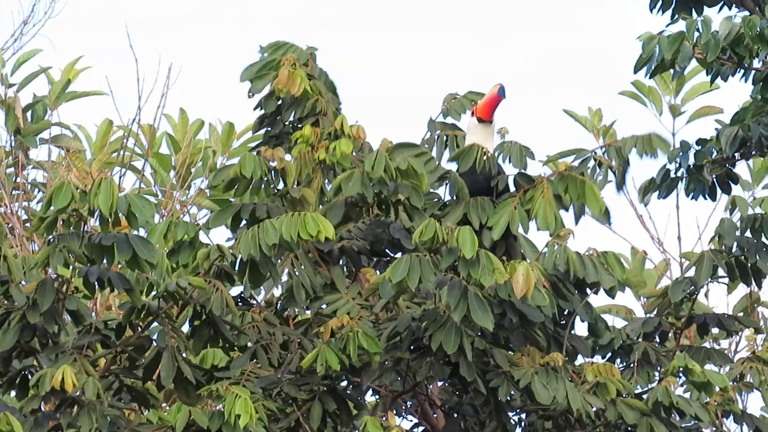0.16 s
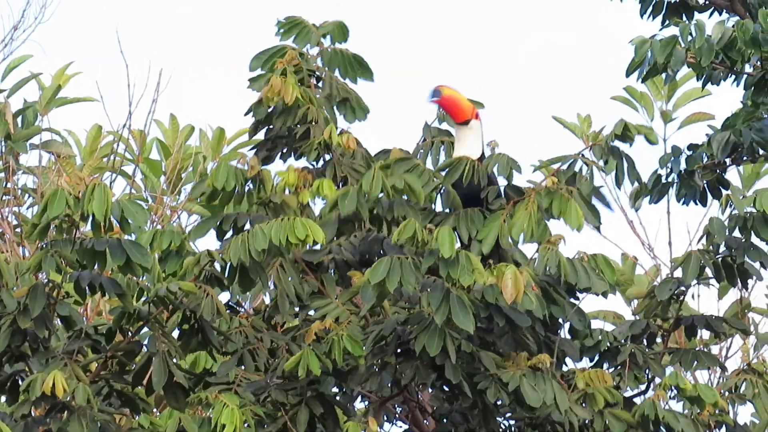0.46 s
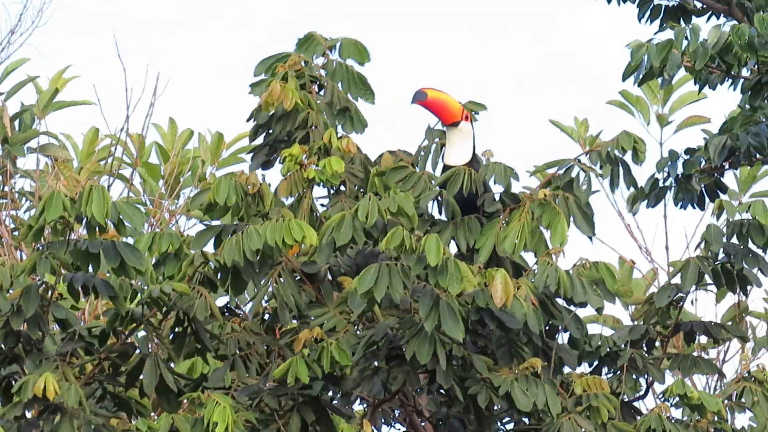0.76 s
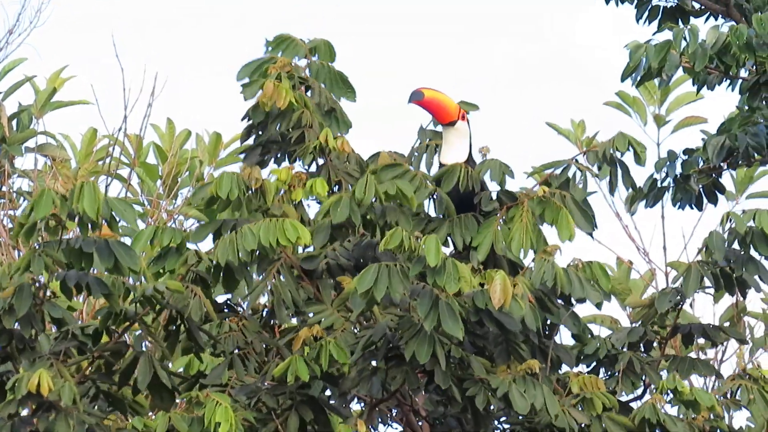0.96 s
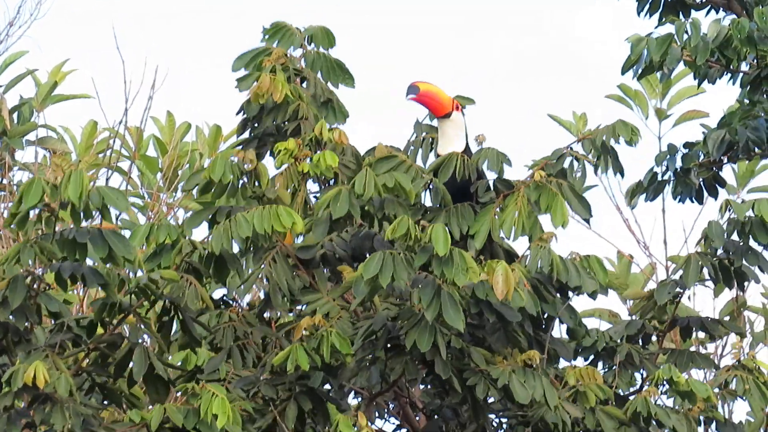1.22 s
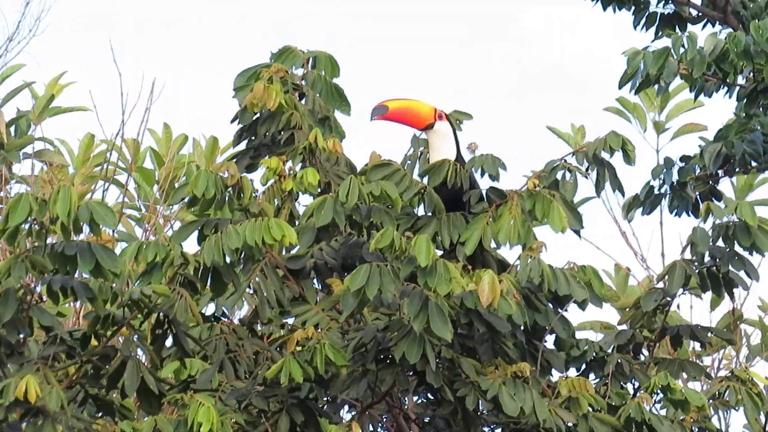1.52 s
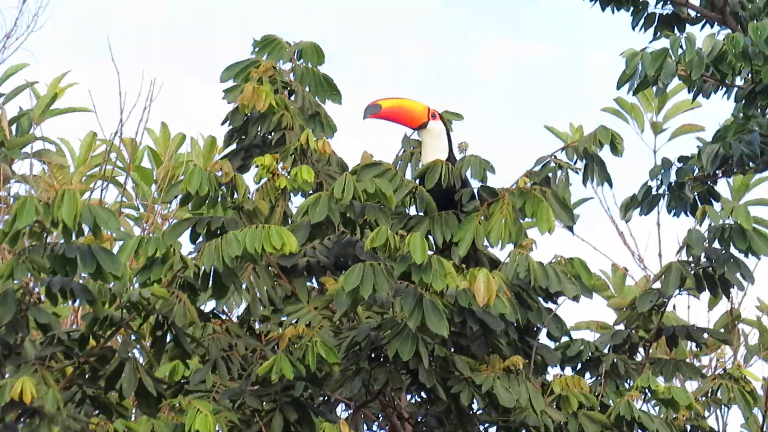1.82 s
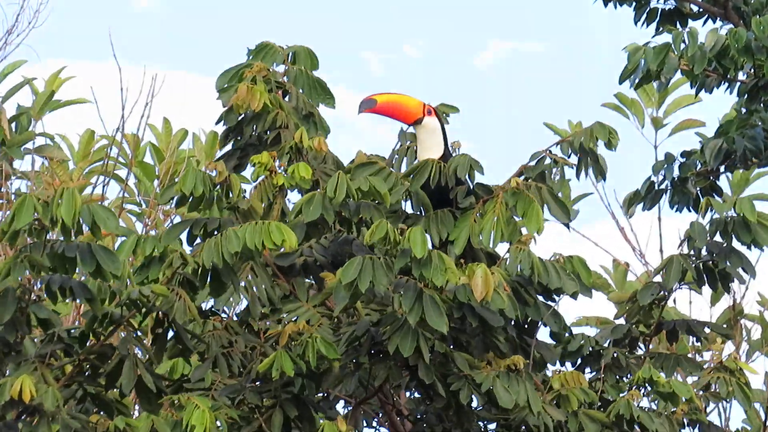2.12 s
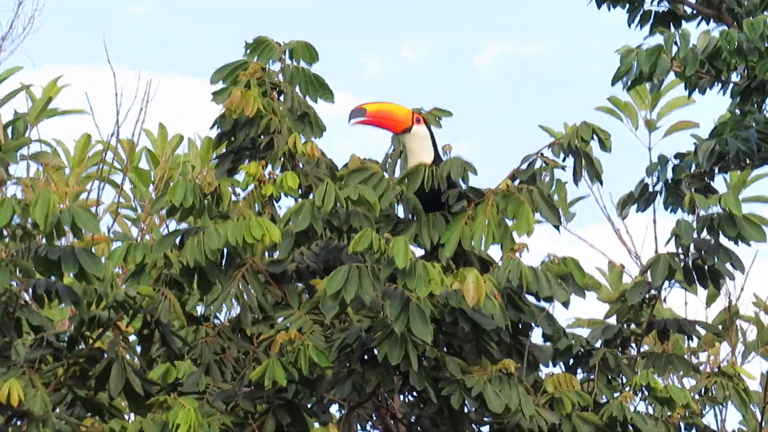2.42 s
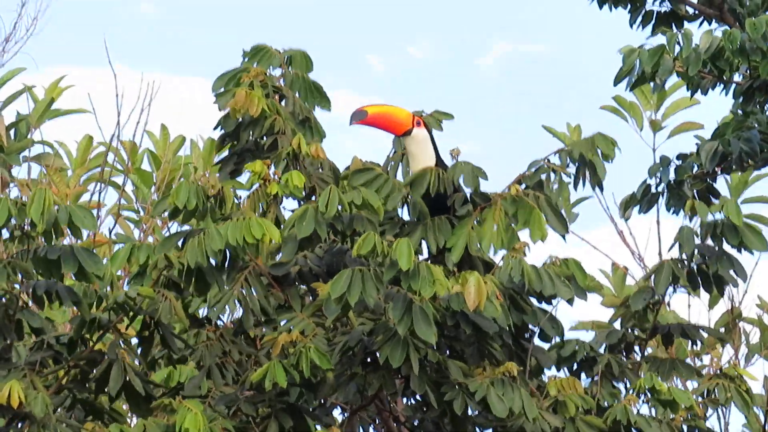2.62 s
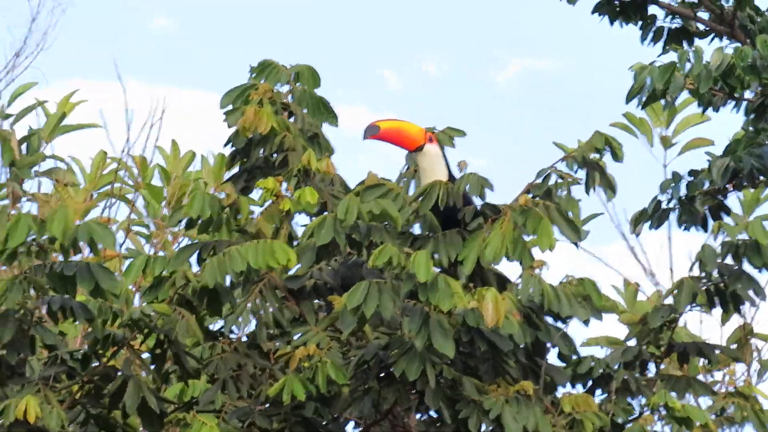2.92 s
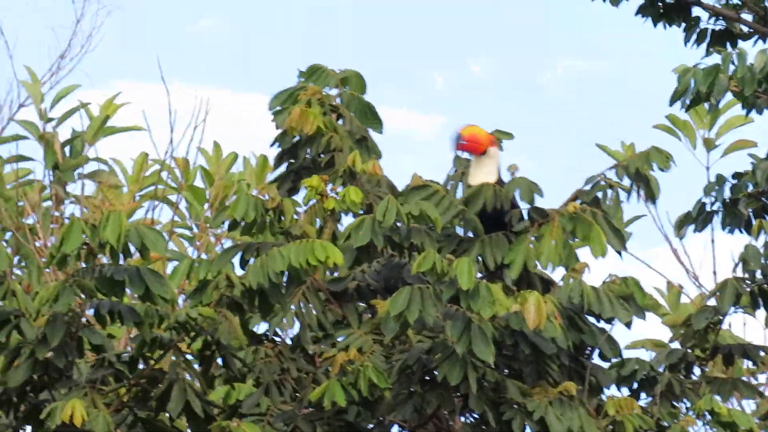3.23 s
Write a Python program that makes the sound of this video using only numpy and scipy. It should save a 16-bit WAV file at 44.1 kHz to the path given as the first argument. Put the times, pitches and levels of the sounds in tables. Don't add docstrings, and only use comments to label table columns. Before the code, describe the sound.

A toucan croaks four times, at about 0.35, 1.25, 2.3 and 3.15 seconds. Each croak lasts about 0.2 seconds: nine or so rapid throaty clicks, slowing slightly, swelling and opening into a hollow, nasal rasp, strongest around 1.8 kHz. The third starts softest; the last is brightest. Trees add short echoes and a diffuse tail. Quiet distant traffic rumble, wavering low engine drone and faint hiss run throughout.

```python
import sys
import numpy as np
from scipy import signal
from scipy.fft import rfft, irfft
from scipy.io import wavfile
from scipy.ndimage import uniform_filter1d

SR = 44100
rng = np.random.default_rng(int(sys.argv[2]) if len(sys.argv) > 2 else 0)


def master(y):
    cut = np.clip(np.atleast_2d(y).T, -1, 1)
    pcm = np.round(cut * 32767)
    wavfile.write(sys.argv[1], SR, pcm.astype(np.int16))


def invert_db(level):
    return 10 ** (np.asarray(level, dtype=float) / 20)


N = 148617


def evened(x):
    return x / np.sqrt(np.mean(abs(x) ** 2) + 1e-20)


def read(points, hz):
    f, value = np.transpose(points)
    return np.interp(np.log(hz + 1), np.log(f + 1), value)


def add(mix, s, sound):
    part = mix[round(s * SR):][:len(sound)]
    part += sound[:len(part)]


def slow(t, top_hz):
    rates = np.geomspace(.3, top_hz, 16)
    return evened(sum(np.sin(2 * np.pi * (f * t + rng.random())) / np.sqrt(f) for f in rates))


# (frequency [Hz], level [dB per Hz])
RUMBLE_SPECTRUM = [(18, -10), (30, 1), (41, -22.5), (68, -2.5), (141, -10), (259, -12), (450, -19),
                   (620, -35.5), (900, -81)]
# (frequency [Hz], level [dB per Hz])
WASH_SPECTRUM = [(350, -28), (600, -1), (777, -5), (843, -4.5), (1120, -6.5), (1640, -13.5), (3810, -24),
                 (5970, -28), (15500, -44.5)]
# (frequency [Hz], likeness [0-1])
PORT_LIKENESS = [(60, .9998), (300, .985), (700, .97), (1500, .95), (3000, .87), (6000, .78), (9000, .88),
                 (12000, .97)]
# (frequency [Hz], lead [rad])
PORT_LEAD = [(30, -0.4), (70, 0.16), (140, 0.29), (280, 0.99), (430, 1.0), (560, 0.34), (690, -0.21),
             (2000, 0.5)]
# (frequency [Hz], left over right [dB])
PORT_TILT = [(60, -1.2), (180, -2.2), (550, 0.99), (1650, 1.0), (4970, 0.0), (15000, 0.0)]
RUMBLE_DB, WASH_DB = -36.5, -48.5


def traffic(spectrum, level_db, patchy_db, swell_db):
    frames, hz = N // 512 + 5, np.fft.rfftfreq(2048, 1 / SR)
    a, b, c, d, patches = rng.standard_normal((frames, 1025, 5)).T
    patches = uniform_filter1d(patches, size=6, axis=0)
    patches = evened(uniform_filter1d(patches, size=8, axis=1))
    same = np.clip(read(PORT_LIKENESS, hz), 0, 1)[:, None]
    common, private = a + 1j * b, c + 1j * d
    port = (invert_db(read(PORT_TILT, hz) / 2) * np.exp(.5j * read(PORT_LEAD, hz)))[:, None]
    left = common * port
    right = (same * common + np.sqrt(1 - same ** 2) * private) / port
    swell = swell_db * slow(np.arange(frames) * 512 / SR, 3.1)
    z = np.array([left, right]) * invert_db(read(spectrum, hz)[:, None] + patchy_db * patches + swell)
    noise = signal.istft(z, nperseg=2048, noverlap=1536)[1][:, 512:N + 512]
    return invert_db(level_db) * evened(noise)


def fine(t, curve):
    return np.interp(np.arange(N) / SR, t, curve)


def tone(hz):
    return np.sqrt(2) * np.sin(2 * np.pi * np.cumsum(hz) / SR)


# (frequency [Hz], level [dB rms], waver [share of pitch], swell [dB])
SIDE_ORDERS = [(30.3, -67.5, 0.021, -15), (85, -49, 0.044, 6), (118.3, -50, 0.0382, 1),
               (170, -51, 0.0317, -4)]
# (time [s], frequency [Hz], level [dB rms])
MAIN_ORDER = [(0.0, 73.4, -47), (0.03, 73.6, -47), (0.46, 72.3, -72), (0.58, 68.95, -40), (1.88, 66.1, -41),
              (2.01, 73.9, -35.5), (2.14, 67.5, -36), (2.26, 68.7, -31.5), (2.38, 70.8, -62),
              (2.6, 66.45, -34.5), (2.99, 65.3, -44), (3.37, 67, -55)]


def drone():
    t = np.arange(0, N + 400, 400) / SR
    tones = np.zeros(N)
    for hz, db, waver, swell_db in SIDE_ORDERS:
        level = invert_db(db + swell_db * fine(t, slow(t, 8)))
        tones += level * tone(hz * (1 + waver * fine(t, slow(t, 6))))
    s, hz, db = np.transpose(MAIN_ORDER)
    pitch = fine(t, np.interp(t, s, hz) * (1 + .02 * slow(t, 7.3)))
    level = invert_db(fine(t, np.interp(t, s, db) + 2.1 * slow(t, 5.9)))
    tones += level * tone(pitch)
    return tones * invert_db(np.array([[-.6], [.6]]))


# (delay [s], left level [dB], right level [dB])
BRANCHES = [
    (.0042, -14, -9),
    (.0072, -10, -17),
    (.019, 2, -3),
    (.027, -35.5, -9),
]
# (frequency [Hz], decay t60 [s], left-right likeness [0-1])
TREE_DECAY = [(1000, 0.51, 0.92), (1750, 0.5, 0.98), (3500, 0.69, 0.81), (6000, 0.67, .6),
              (10000, 0.17, .3)]
TREES_DB, TREES_RISE_S = -0.5, 0.011
NEAR_LEAVES_DB, NEAR_LEAVES_S = 1.5, 0.032
OPPOSED_HZ = 10600


def trees(x):
    taps = np.zeros((2, SR))
    at = np.arange(200, SR - 20, 20) + rng.integers(0, 20, (2, (SR - 201) // 20))
    np.put_along_axis(taps, at, rng.choice([-1., 1.], at.shape), 1)
    hz, t, z = signal.stft(taps, SR, nperseg=256)
    table = np.array(TREE_DECAY)
    alike = np.clip(read(table[:, ::2], hz), 0, 1)[:, None]
    z[1] = alike * z[0] + np.sqrt(1 - alike ** 2) * z[1]
    decay = invert_db(-60 * t / read(table[:, :2], hz)[:, None])
    tail = signal.istft(z * decay, SR, nperseg=256)[1][:, :SR]
    s = np.arange(SR) / SR
    tail *= np.minimum(s / TREES_RISE_S, 1) * (1 + invert_db(NEAR_LEAVES_DB) * np.exp(-s / NEAR_LEAVES_S))
    tail *= invert_db(TREES_DB) / np.linalg.norm(tail[0])
    tail[:, 0] = 1
    for delay, left_db, right_db in BRANCHES:
        tail[:, round(delay * SR)] += invert_db(np.array([left_db, right_db]))
    lag = np.pi * np.minimum(np.arange(SR // 2 + 1) / OPPOSED_HZ, 1.2) ** 4
    tail[1] = irfft(rfft(tail[1]) * np.exp(-1j * lag), SR)
    return signal.fftconvolve(x[None], tail, axes=1)[:, :N]


def whitened(x):
    z = rfft(x)
    smooth_power = uniform_filter1d(abs(z) ** 2, size=7)
    return evened(irfft(z / np.sqrt(smooth_power + 1e-9), len(x)))


GAP_FIRST_S, GAP_LAST_S, GAP_SETTLE = .0135, .0205, 2.2
FLUTTER_DB, FLUTTER_S = 0, .0026
UNEVEN_DB, RASP_DB = 2, -9


def throat(at, shut, first_db):
    u = np.arange(500) / SR / FLUTTER_S
    burst = u ** 0.66 * np.exp(-u)
    noise = rng.standard_normal((13, 500))
    size_db = UNEVEN_DB * rng.standard_normal(12)
    size_db[0] += first_db
    rasp = invert_db(RASP_DB) * np.gradient(rng.standard_normal(len(shut))) * 2
    drive = rasp * (np.arange(len(shut)) / SR < at[-1]) * (1 - shut) ** 2
    for n, s in enumerate(at):
        click = whitened(burst * (noise[12] + invert_db(FLUTTER_DB) * noise[n]))
        add(drive, s, invert_db(size_db[n]) * click)
    return drive


def resonate(x, hz, width):
    turn = np.exp(2j * np.pi * np.cumsum(hz) / SR)
    r = np.exp(-np.pi * width / SR)
    return 2 * (turn * signal.lfilter([(1 - r) ** 2], [1, -2 * r, r * r], x / turn)).real


# (open frequency [Hz], width [Hz], level [dB], extra at the onset [dB],
# pitch at the onset [share of open])
TRACT = [(1489, 285, -6.5, 17, 0.995), (1759, 168, 8, -10, 0.967), (2200, 290, -26, -5, 1.18),
         (2467, 570, -6.5, 7, 0.92), (2805, 260, -6.5, 5, 1.052), (3217, 330, -12, 5, 0.96),
         (3534, 290, -7.5, -2, 0.915), (4280, 530, -10.5, 2, 0.95), (5207, 400, -15, -10, 1),
         (6060, 780, -25, 15, 0.33), (6700, 1600, -27, -9, 0.85), (9400, 2900, -33.5, -11, .98),
         (11800, 2500, -60, -22.5, 0.76)]
WANDER, WANDER_DB, WANDER_HZ = .02, 2.2, 25


def windpipe(drive, shut, bright_db):
    t = np.arange(len(drive)) / SR
    rung = np.zeros(len(drive))
    for n, (hz, width, db, onset_db, low) in enumerate(TRACT):
        level_db = db + onset_db * shut + bright_db * (hz / 1000 - 4.5)
        level_db = level_db + WANDER_DB * slow(t, WANDER_HZ) * (n > 1)
        glide = hz * (1 - (1 - low) * shut + WANDER * slow(t, WANDER_HZ) * (n != 1))
        rung += (-1) ** n * resonate(drive * invert_db(level_db) / np.sqrt(width / 100), glide, width)
    return rung


# (start [s], count [clicks], effort [dB], first click level [dB], brightness [dB per kHz])
CROAKS = [
    (.345, 9.57, -16, -1.5, 1),
    (1.258, 9.48, -17, -6, 0.5),
    (2.32, 9.45, -17.5, -10, 0.2),
    (3.142, 9.44, -16, -0.8, 1.08),
]
ONSET_DB, PEAK_AT, END_DB = -11, 0.65, -7
BLOOM = 2.12


def croak(clicks, effort_db, first_db, bright_db):
    k = np.arange(round(clicks))
    gaps = GAP_LAST_S - (GAP_LAST_S - GAP_FIRST_S) * np.exp(-k / GAP_SETTLE)
    at = np.cumsum(gaps) - gaps
    t = np.arange(round(.3 * SR)) / SR
    shut = np.clip(1 - t / (PEAK_AT * at[-1]), 0, 1) ** BLOOM
    late = np.clip((t / at[-1] - PEAK_AT) / (1 - PEAK_AT), 0, 2) ** 2
    drive = 2 * throat(at, shut, first_db) * invert_db(ONSET_DB * shut + END_DB * late)
    return invert_db(effort_db) * windpipe(drive, shut, bright_db)


def scene():
    road = traffic(RUMBLE_SPECTRUM, RUMBLE_DB, patchy_db=1.5, swell_db=-0.08)
    road += traffic(WASH_SPECTRUM, WASH_DB, patchy_db=1.4, swell_db=-0.04)
    bird = np.zeros(N)
    for start, *manner in CROAKS:
        add(bird, start, croak(*manner))
    bird_pan = invert_db(np.array([[.3], [-.3]]))
    return road + drone() + trees(bird) * bird_pan


def band_limit(x):
    return signal.sosfilt(signal.butter(12, 15630, fs=SR, output="sos"), x)


def record(dry):
    edge = signal.firwin(1023, 15680, window=("kaiser", 9), fs=SR)
    mix = signal.oaconvolve(dry, edge[None], "same")
    return band_limit(mix)


dry = scene()
out = record(dry)
master(out)
```